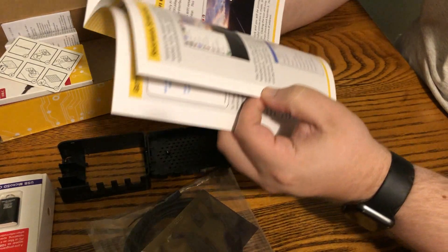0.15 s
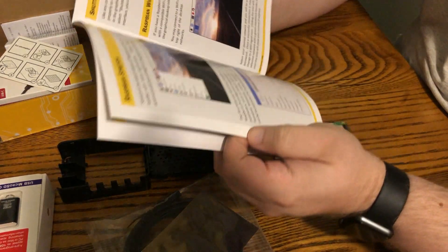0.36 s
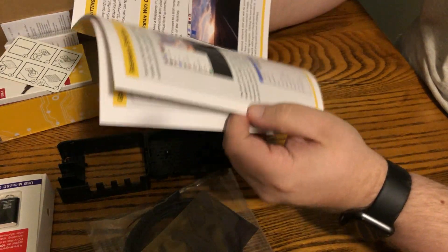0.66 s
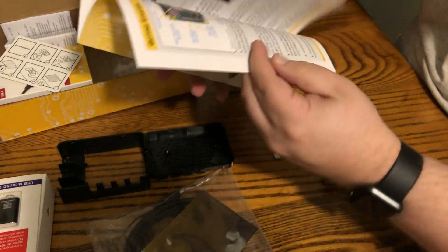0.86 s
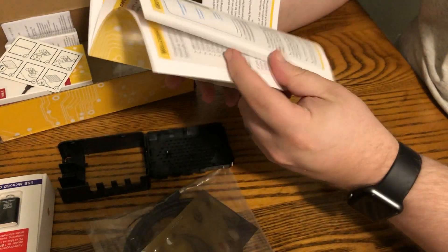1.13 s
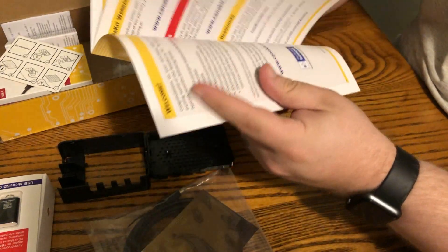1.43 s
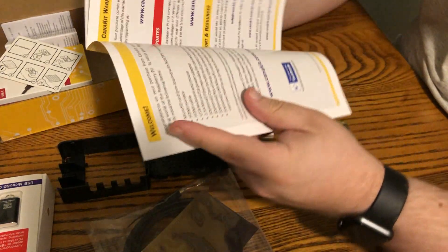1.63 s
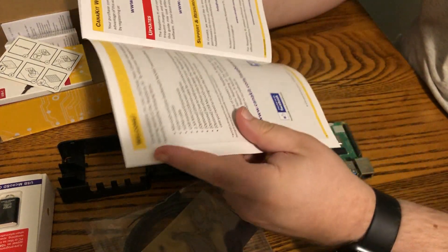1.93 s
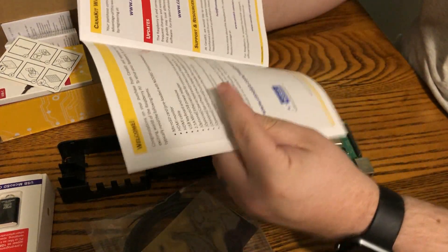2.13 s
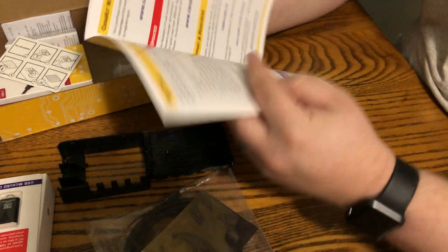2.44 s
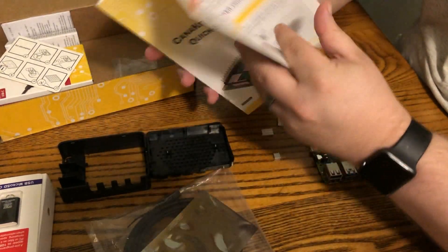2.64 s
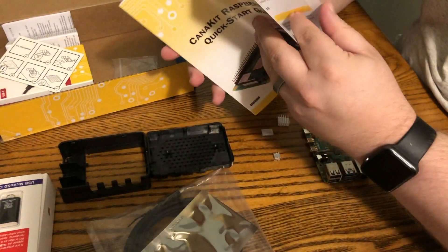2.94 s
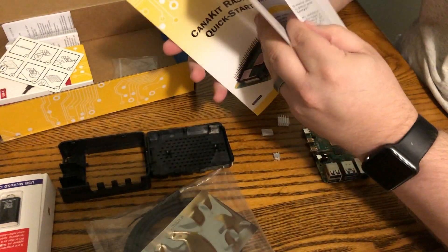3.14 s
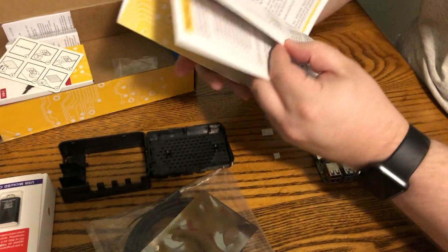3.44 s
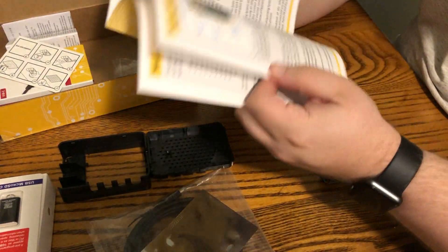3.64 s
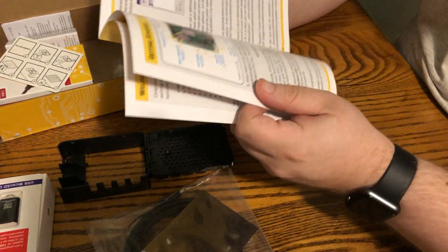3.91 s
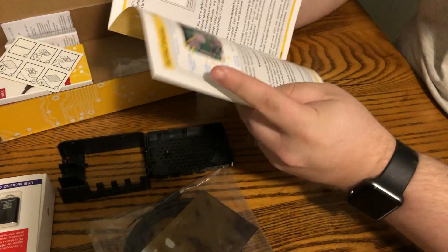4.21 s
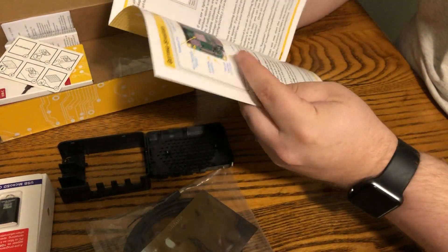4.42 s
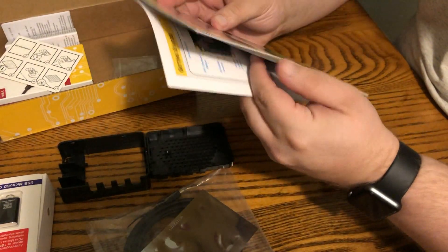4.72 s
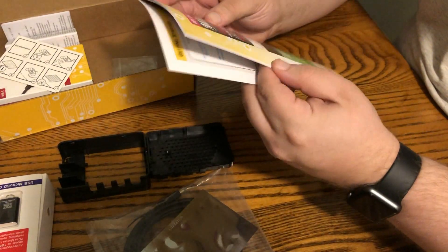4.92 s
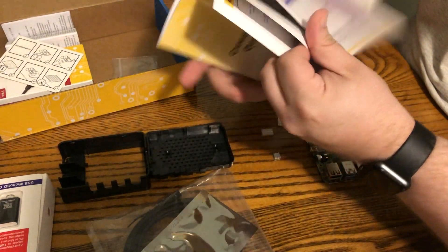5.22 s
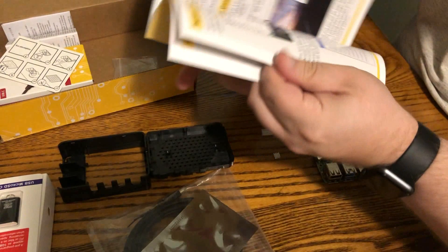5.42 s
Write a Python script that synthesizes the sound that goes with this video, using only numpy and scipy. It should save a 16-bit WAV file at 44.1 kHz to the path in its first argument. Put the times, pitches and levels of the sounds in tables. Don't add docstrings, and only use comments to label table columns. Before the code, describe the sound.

Paper pages brush, snap off a thumb and slap shut in irregular bursts, busiest at the end, above low indoor ventilation hum.

```python
import sys
import numpy as np
from scipy import signal
from scipy.fft import rfft, irfft, next_fast_len
from scipy.io import wavfile
from scipy.ndimage import uniform_filter1d, map_coordinates

SR = 44100
rng = np.random.default_rng(int(sys.argv[2]) if len(sys.argv) > 2 else 0)


def materialize(psi):
    bounded = np.clip(np.atleast_2d(psi).T, -1, 1)
    quanta = np.round(bounded * 32767).astype(np.int16)
    wavfile.write(sys.argv[1], SR, quanta)


def boost_factor(decibels):
    exponent = np.asarray(decibels, float) / 20
    return 10 ** exponent


N = 245498

# (frequency [Hz], density [dB per Hz])
AIR_SPECTRUM = [(15, -67), (25, 0.5), (39, -4), (65, -4), (149, -7), (213, -12), (306, -15), (386, -21.5),
                (756, -23.5), (861, -28), (1140, -33.5), (1600, -41), (11100, -57), (12000, -57),
                (15600, -100), (22000, -120)]
# (frequency [Hz], width [Hz], level [dB])
ROOM_MODES = [(47, 5.2, 7), (103, 17, 1), (120, 18.5, 7), (131.4, 6.3, 7.5), (177.6, 5.6, 7),
              (209.6, 7.5, 10), (254.2, 9.5, 10.5), (300.6, 10.4, 7), (413, 8.4, 5.5), (438.8, 4.8, 11)]
# (time [s], level [dB])
DUCT_SWELLS = [(.22, -32.5), (.42, -29), (.65, -30), (.92, -26.5), (1.35, -33.5), (1.52, -32.5),
               (1.81, -28.5), (2.031, -26), (2.21, -23.5), (2.43, -29), (2.56, -33), (2.78, -30.5),
               (3.16, -28), (3.33, -34), (3.61, -29.5), (3.81, -24.5), (4.0, -26), (4.2, -30), (4.46, -25),
               (4.62, -31.5), (5.0, -31.5), (5.2, -32.5), (5.41, -29.5), (5.55, -28)]
# (strongest at [s], rise time and equal fall time [s], level [dB])
WAVES = [(.1, 0.4, -18), (.46, 0.27, -21), (.8, 0.23, -26), (1.2, 0.95, -23), (1.63, 0.58, -22.5),
         (2.16, 0.15, -18.5), (2.55, 0.59, -21.5), (3.06, 0.63, -31), (3.95, 0.34, -29), (4.31, 0.21, -23),
         (4.68, 0.24, -25), (5.35, 0.52, -24)]
# (frequency [Hz], t60 [s])
ROOM_DECAY = [(300, 0.21), (2000, 0.39), (10000, 0.096)]
# (time [s], peak level [dB], swing [Hz], length [s])
FLAPS = [
    (3.685, -26.5, 260, .008),
    (4.3, -31, 250, 0.028),
    (4.679, -22, 130, 0.015),
    (4.688, -23.5, 188, .016),
    (4.721, -22, 200, 0.0083),
    (5.372, -30, 268, 0.034),
    (5.416, -27.5, 330, .015),
]
# (time [s], level [dB], from [Hz], to [Hz], length [s])
GLIDES = [
    (1.21, -48, 1150, 1550, .045),
    (1.285, -57, 1100, 1450, .03),
    (1.1, -51, 4000, 3300, .03),
    (1.15, -48, 3500, 3600, .05),
    (5.122, -45, 4200, 3700, .03),
    (5.21, -46, 3000, 3600, .025),
    (5.2, -45, 1500, 1050, 0.051),
    (5.253, -44, 2050, 1900, .02),
]
# (time [s], peak level [dB], pitch [Hz], t60 [ms])
POPS = [(1.2645, -29, 1200, 25), (1.268, -46, 7600, 50), (1.362, -38, 2700, 25), (1.362, -46, 7800, 15),
        (3.664, -49, 6200, 8), (3.673, -48, 6500, 9), (3.6815, -30, 2050, 18), (3.683, -33, 1200, 42),
        (3.6815, -35, 6200, 25), (3.729, -46, 3300, 25), (3.753, -46, 3300, 25), (4.054, -34, 1800, 18),
        (4.077, -31, 2000, 20), (4.086, -36, 2200, 15), (4.191, -23, 5200, 11), (4.2, -36, 3500, 15),
        (4.219, -38, 1900, 20), (4.272, -42, 3300, 22), (4.312, -42, 7800, 14), (4.312, -41, 2570, 15),
        (4.507, -45, 2300, 15), (4.518, -47, 2300, 15), (4.678, -34, 6000, 12), (4.683, -36, 7300, 15),
        (4.682, -20, 1250, 24), (4.693, -31, 1900, 15), (4.712, -43, 7600, 14), (4.712, -45, 6100, 12),
        (4.847, -47, 5800, 10.5), (4.953, -44, 8000, 15), (4.953, -46, 6200, 12), (4.973, -46, 7900, 14),
        (5.188, -36, 6800, 20), (5.2, -36, 8200, 15), (5.216, -34, 3700, 15), (5.275, -24, 3400, 18),
        (5.275, -32, 8000, 15), (5.277, -32, 1170, 35), (5.279, -33, 1680, 30), (5.374, -31, 3200, 18),
        (5.372, -37, 7300, 18), (5.469, -25, 2600, 15), (5.468, -33, 7000, 10), (5.469, -33, 1450, 35),
        (5.509, -36, 5800, 12), (5.509, -38, 10500, 12), (5.541, -35, 1400, 25), (5.061, -40, 1760, 15),
        (4.64, -41, 1900, 15), (4.822, -48, 3700, 14)]
# (time [s], level [dB], pitch [Hz], length [s], width [Hz])
SQUEAKS = [(0.46, -46, 3230, 0.016, 430), (0.59, -49, 1960, 0.055, 700), (1.15, -56, 2300, 0.08, 1200),
           (1.14, -52, 1220, 0.059, 450), (5.201, -38.5, 1200, 0.091, 900), (5.314, -47, 5800, .05, 2200),
           (5.399, -45, 5870, 0.028, 2000), (5.128, -43, 2650, .035, 300), (1.366, -46, 2700, 0.022, 500),
           (5.218, -42.5, 3750, .06, 900), (1.198, -50, 7200, .035, 5000), (1.2, -45, 3600, 0.035, 1100),
           (1.605, -63, 4700, .1, 500), (2.918, -53, 5500, .03, 600), (2.998, -51, 6500, 0.037, 1200),
           (3.302, -47.5, 6600, 0.05, 1500), (3.685, -40, 6800, 0.0082, 1600),
           (5.096, -38.5, 1500, 0.011, 100), (2.765, -52, 5800, 0.025, 900), (2.875, -54, 7000, .04, 1500),
           (5.131, -41, 1750, 0.016, 150), (5.13, -42, 6200, 0.022, 1800), (5.159, -34.5, 2680, 0.01, 140),
           (5.244, -33, 1960, 0.0074, 149), (5.296, -36, 3170, 0.0062, 300)]
# (time [s], peak level [dB], air pocket [Hz], push share [0-1], thump [dB])
SLAPS = [(1.2646, -22, 1130, 0.8, -10), (2.268, -31, 1440, 0.3, 3), (2.787, -25, 743, 0.54, 15),
         (3.683, -25.5, 1150, 0.4, 2), (4.0453, -13.5, 696, 0.9, 0), (4.6829, -11, 1230, 0.74, 6),
         (4.689, -20, 900, 0.3, 8), (4.72, -25, 700, 0.7, 17), (5.4035, -13, 714, 0.7, -10),
         (5.406, -14, 1060, 0.75, -3), (5.45, -24, 802, 0.6, 16), (5.469, -20, 690, 0.5, 14),
         (5.477, -26.5, 1300, 0.6, 3), (5.383, -30, 600, 0.7, 14), (5.416, -29, 1200, .5, 12),
         (2.54, -33, 900, .4, -4), (2.667, -34, 900, .4, -1), (4.081, -30, 1300, 0.35, -8),
         (5.126, -28, 1200, .3, -8), (5.232, -25.5, 900, .3, 10), (5.51, -31, 900, 0.7, 2)]
# (time [s], peak level [dB], sheet ring [Hz], brightness [dB], tearing [ms])
SNAPS = [(0.0135, -30, 1200, -12, 1.5), (0.4535, -39, 3310, -17, 2), (0.855, -33, 1500, -13, 1.8),
         (1.2655, -24.5, 3300, -5.5, .9), (1.362, -32, 2650, -24, 2.7), (1.6077, -36.5, 2690, -19, 2.6),
         (2.5336, -33, 1300, -13, 3), (2.7202, -35.5, 2300, -8, 2.5), (2.7685, -30.5, 1950, -13, 2.6),
         (2.8034, -29, 1900, -18, 2), (2.9238, -30.5, 1700, -18, 3.1), (2.9687, -35, 2260, -20, 1.2),
         (2.9826, -31.5, 2900, -4, 1.33), (3.268, -37, 2320, -13, 1.2), (3.2839, -35, 2300, -1, 1.2),
         (3.839, -34, 2510, -22, 1.3), (4.0465, -24, 2400, -15, 0.92), (4.078, -29, 2300, -20, 1.5),
         (4.086, -37, 2780, -23, 1.2), (4.1925, -18.5, 3530, -10, 1.4), (4.313, -37, 2180, -6, 1.3),
         (4.679, -28, 2900, -0.5, 1.1), (5.2420, -28, 1990, -14, 1.2), (5.2755, -20.5, 3400, -5, 3),
         (5.3736, -24.5, 3200, -7, 2.2), (5.3982, -28, 3000, -10, 1.5), (5.4695, -20.5, 2620, -7, 1),
         (5.5102, -25, 2570, 0.5, 0.63), (5.5417, -31, 1400, -15, 2.2), (5.186, -31, 2700, -3, 2.5),
         (5.206, -32, 3200, -6, 1.5), (5.2945, -28, 3170, -16, 1.2), (5.383, -30, 2500, -15, 1.6),
         (5.486, -35, 2800, -9, 1.5), (5.521, -37, 2700, -5, 2), (5.564, -35, 3000, -15, 1.5),
         (5.168, -30, 1200, -15, 2.5), (1.107, -35, 1200, -12, 1.5), (1.2745, -32, 3300, -12, 1.5),
         (1.408, -40, 2400, -12, 1.5)]
# (time [s], peak level [dB], brightness
# [dB])
TICKS = [(0.117, -46, -4), (0.197, -41, -21), (0.8886, -37, -16), (1.837, -46, -18), (2.2666, -35, -16),
         (2.344, -38.5, -5), (2.4676, -41, -18), (2.6444, -35, -1), (2.6638, -34, -22),
         (2.7915, -29.5, -11), (2.8915, -32, -6), (2.953, -43, -16), (3.467, -44, -14), (3.547, -48, 4),
         (4.6844, -26.5, -8), (3.69, -32, -12), (3.927, -37, -18), (3.9816, -40, -23), (4.188, -22.5, -16),
         (4.2, -30, -24), (4.7144, -49, -4), (4.8493, -44, -5), (4.9544, -37, -10), (4.9736, -40, -15),
         (2.491, -40, -9), (3.682, -28, -2.5), (5.0763, -34, -14), (5.125, -33, -6), (2.4758, -41, -18),
         (2.553, -43, -3), (2.70, -44, -6), (2.78, -40, -8), (2.8574, -42, -2), (3.025, -46, -4),
         (.064, -45, -5), (5.005, -37, -12), (5.012, -31.5, -20)]
# (fastest at [s],
# speeding up [s], slowing down [s], rub level [dB], brightness [dB])
SWEEPS = [(0.073, .03, 0.085, -64, 5), (0.59, 0.065, 0.024, -50, -0.5), (.814, 0.039, 0.21, -59.5, 1),
          (.888, 0.033, 0.03, -55, -4), (1.1, 0.056, 0.12, -48.5, 4.5), (1.21, 0.15, 0.1, -47, -2.5),
          (1.36, .08, 0.19, -57, -3), (1.6, 0.1, .08, -58, 5), (2.545, .06, 0.081, -51.5, -0.5),
          (2.76, 0.12, 0.12, -53, -3), (2.865, 0.033, 0.096, -55.5, 6), (3.0, .05, 0.16, -59.5, 2),
          (3.301, 0.046, 0.07, -46, 2.5), (3.38, 0.16, 0.46, -65, -2.5), (3.7, 0.04, 0.14, -49, -2),
          (3.844, 0.094, 0.16, -50, -3), (4.185, 0.12, 0.093, -49, 0.5), (4.288, 0.08, 0.073, -51, 0),
          (4.655, 0.14, 0.062, -51.5, 2.5), (4.78, 0.053, 0.11, -57.5, -2),
          (5.125, 0.086, 0.064, -43, -3.5), (5.2, 0.027, 0.1, -38.5, 2), (5.372, 0.048, 0.051, -43, -1),
          (5.506, 0.094, 0.13, -44, -1), (4.191, 0.013, 0.025, -42, -5), (4.943, .003, .006, -58, 3),
          (4.768, .003, .012, -60, -2), (4.4, .005, .012, -59, 0), (5.02, .006, .015, -52, -10),
          (4.087, .004, .012, -49, -7), (4.6, 0.065, .05, -61, 5), (2.277, .006, .02, -55, -14),
          (2.69, .004, .012, -58, 0), (2.354, .004, .012, -59, 0), (5.407, .012, 0.016, -48, 4),
          (3.691, .006, .012, -44, 2), (1.15, .06, .06, -55, -1), (5.478, .008, .02, -46, -9)]
# (time [s], rub level [dB], brightness [dB])
FLICKS = [(.001, -50.5, -2), (.194, -58, -8), (.25, -58, -15), (0.457, -48.5, -4), (.56, -59, -1),
          (.725, -61, 0), (.965, -59, 0), (1.285, -45, -4), (1.364, -48, -7.5), (1.75, -61, 0),
          (2.274, -58, -19), (2.342, -67, -2), (2.47, -57, 0), (2.63, -52, 2), (2.8, -53, -5),
          (2.92, -54, -11), (3.23, -54.5, -1), (3.984, -50, -7), (4.036, -53.5, 0), (4.095, -49.5, -10),
          (4.2, -53, -5), (5.165, -44.5, -3), (4.52, -64, -14), (4.7, -46, -14), (4.725, -53, -14),
          (4.797, -58, -8), (4.825, -61, -8), (4.38, -61, -16), (.52, -58, -6), (.37, -63, -8),
          (3.57, -66, 4), (4.958, -65, 6), (5.01, -56, -5), (5.075, -48.5, -9), (5.268, -42, -6),
          (5.315, -47.5, 4), (5.445, -50, 0)]
# (frequency [Hz], density [dB per Hz])
FLEX_SPECTRUM = [(500, 3), (900, -3.5), (1300, 1), (1900, -5.5), (2600, -8), (4500, -44)]
RUB_SPECTRUM = [(1200, -2), (2300, 0.5), (2900, 0), (3300, 2.5), (3650, -2.5), (4100, -5.5), (5500, -17),
                (9000, -55)]
SHEEN_SPECTRUM = [(2000, -55), (4000, -1), (6500, 3.5), (8500, -1), (11500, -0.5), (13000, -31)]

FLICK_RISE_S, FLICK_FALL_S = 0.025, 0.063
FLEX_DB, SHEEN_DB = 6.5, -1
FLEX_LEANS, SHEEN_LEANS = -0.38, 0.93
HELD_DB, HELD_BRIGHT_DB = -74, -4.5
SWEEP_SHAPE, FLICK_SHAPE, AIR_SHAPE = 1.6, 1.04, 1.23
FADE_DB = 21
SWELL_S = 0.14
STACK_HZ, TICK_MS, FLUTTER_T60_S = 1800, 1.06, 0.039
THUD_T60_S, PUFF_DB = 0.033, -1.5
GLIDE_WIDTH_HZ = 480
POP_ATTACK_S, POP_SAG = 0.001, 0.03


def unit(x):
    return x / np.sqrt(np.mean(x ** 2) + 1e-20)


def along(points, hz):
    f, value = np.transpose(points)
    return np.interp(np.log(hz + 1), np.log(f + 1), value)


def wobble(rate):
    knots = rng.standard_normal(int(N * rate / SR) + 4)
    return map_coordinates(knots, [np.arange(N) * rate / SR])


def filtered(x, response):
    m = next_fast_len(len(x) + 8192)
    return irfft(rfft(x, m) * response(np.fft.rfftfreq(m, 1 / SR)), m)[:len(x)]


def peak(f, hz, width_hz):
    return 1j * f * width_hz / (hz * hz - f * f + 1j * f * width_hz)


def add(track, s, sound):
    part = track[max(round(s * SR), 0):][:len(sound)]
    part += sound[:len(part)]


def swells(s, rise_s, fall_s, db, shape):
    s, rise_s, fall_s, db = [np.reshape(v, (-1, 1)) for v in (s, rise_s, fall_s, db)]
    late = np.arange(0, N + 64, 32) / SR - s
    far = np.maximum(-late / (np.abs(rise_s) + 0.0013), late / (np.abs(fall_s) + 0.0014))
    power = boost_factor(2 * (db - FADE_DB * far ** shape)).sum(axis=0)
    return np.interp(np.arange(N) / 32, np.arange(len(power)), np.sqrt(power))


def ventilation():
    def response(f):
        modes = sum(boost_factor(2 * db) * np.abs(peak(f, hz, w)) ** 2 for hz, w, db in ROOM_MODES)
        gap = 1 - 0.5 * np.abs(peak(f, 92.3, 7.7))
        return boost_factor(along(AIR_SPECTRUM, f)) * np.sqrt(1 + modes) * gap

    noise = filtered(rng.standard_normal(N), response)
    return boost_factor(-30 + 0.29 * wobble(5.15)) * unit(noise)


def hum():
    s, db = np.transpose(DUCT_SWELLS)
    hz = 139.5 + 2.47 * wobble(9)
    tone = np.sin(2 * np.pi * np.cumsum(hz) / SR)
    return boost_factor(2) * swells(s, SWELL_S, SWELL_S, db, AIR_SHAPE) * tone


def draught():
    s, length, db = np.transpose(WAVES)
    slow = filtered(rng.standard_normal(N), lambda f: peak(f, 12.2, 39) / (1 + (f / 20) ** 14))
    return swells(s, length, length, db, AIR_SHAPE) * unit(slow)


def room(x):
    hz, t, z = signal.stft(rng.standard_normal(SR // 2), SR, nperseg=256)
    decay = boost_factor(-60 * t / along(ROOM_DECAY, hz)[:, None])
    tail = signal.istft(z * decay, SR, nperseg=256)[1]
    late = np.pad(x, (260, 0))
    return signal.fftconvolve(late, tail / np.linalg.norm(tail))[:N]


def flaps():
    s, db, hz, length = np.transpose(FLAPS)[:, :, None]
    t = np.arange(N) / SR - s
    swing = np.exp(-(2 * t / length) ** 2) * np.sin(2 * np.pi * hz * t)
    return (boost_factor(db) * swing).sum(axis=0)


def glides():
    out, t = np.zeros(N), np.arange(-SR // 8, SR // 8) / SR
    noises = rng.standard_normal((len(GLIDES), 2, len(t)))
    for (s, db, from_hz, to_hz, length), noise in zip(GLIDES, noises):
        a, b = [unit(filtered(v, lambda f: 1 / (1 + (2 * f / GLIDE_WIDTH_HZ) ** 2))) for v in noise]
        hz = np.interp(t / length, [-0.5, 0.5], [from_hz, to_hz])
        turn = 2 * np.pi * np.cumsum(hz) / SR
        swell = np.exp(-(1.6 * t / length) ** 4)
        add(out, s + t[0], boost_factor(db) * swell * (a * np.cos(turn) + b * np.sin(turn)))
    return out


def pops():
    out, t = np.zeros(N), np.arange(SR // 16) / SR
    for s, db, hz, t60_ms in POPS:
        life = t / (t60_ms / 1300 + 1e-3)
        turn = 2 * np.pi * hz * t * (1 - POP_SAG * np.minimum(life, 1))
        attack = 1 - np.exp(-t / POP_ATTACK_S)
        add(out, s, boost_factor(db + 4.5 - 60 * life) * attack * np.sin(turn))
    return out


def squeaks():
    out, t = np.zeros(N), np.arange(SR // 3) / SR
    noises = rng.standard_normal((len(SQUEAKS), len(t)))
    for (s, db, hz, length, width_hz), noise in zip(SQUEAKS, noises):
        swell = np.exp(-((t - t.mean()) / (length / 2)) ** 2)
        tone = filtered(noise, lambda f: peak(f, hz, width_hz) ** 2)
        loudness = np.sqrt(np.average(tone ** 2, weights=swell ** 2))
        add(out, s - t.mean(), boost_factor(db) * swell * tone / loudness)
    return out


def slaps():
    out, t = np.zeros(N), np.arange(SR // 8) / SR
    noises = rng.standard_normal((len(SLAPS), len(t)))
    for (s, db, hz, share, thump_db), noise in zip(SLAPS, noises):
        def pocket(f):
            return (peak(f, hz, 0.21 * hz) + boost_factor(thump_db) * peak(f, 382, 160)) * peak(f, 370, 2000)

        pulse = -np.exp(-((t - 0.001) / 0.00032) ** 2)
        push = filtered(pulse, lambda f: pocket(f) + boost_factor(PUFF_DB) * peak(f, 290, 2800))
        thud = filtered(noise * boost_factor(-60 * t / THUD_T60_S) * (1 - np.exp(-t / 0.0014)), pocket)
        sound = share * push / np.abs(push).max() + (1 - share) * thud / np.abs(thud).max()
        add(out, s - 0.001, boost_factor(db + 3) * sound)
    return out


def snaps():
    def sheet(f, hz):
        return (peak(f, hz, 0.2 * hz) + 0.19 * peak(f, 2000, 4500)) * peak(f, 1200, 6600)

    out, t = np.zeros(N), np.arange(SR // 8) / SR
    edges = SNAPS + [(s, db, STACK_HZ, bright_db, TICK_MS) for s, db, bright_db in TICKS]
    noises = rng.standard_normal((len(edges), 2, len(t)))
    for (s, db, hz, bright_db, ms), noise in zip(edges, noises):
        u = t / (ms / 1000 + 1e-4)
        flutter = boost_factor(-60 * t / FLUTTER_T60_S) * (1 - np.exp(-u * u))
        crack = 1.4 * np.exp(-(1.34 * (u - 1.2)) ** 2)
        burst = noise * (flutter + crack)
        body = filtered(burst[0], lambda f: sheet(f, hz))
        edge = filtered(burst[1], lambda f: peak(f, 5800, 5100) ** 2 * (0.35 + peak(f, 5700, 6000)))
        add(out, s - 0.0015, boost_factor(db - 0.5) * body / np.abs(body).max())
        add(out, s - 0.0015, boost_factor(db + bright_db) * edge / np.abs(edge).max())
    return out


def strokes(over_db, leans):
    s, rise_s, fall_s, db, bright_db = np.transpose(SWEEPS)
    sweeps = swells(s, rise_s, fall_s, db + over_db + leans * bright_db, SWEEP_SHAPE)
    s, db, bright_db = np.transpose(FLICKS)
    flicks = swells(s, FLICK_RISE_S, FLICK_FALL_S, db + over_db + leans * bright_db, FLICK_SHAPE)
    held = boost_factor(HELD_DB + over_db + leans * HELD_BRIGHT_DB)
    return held + np.hypot(sweeps, flicks)


def crackle():
    rub = strokes(0, 0)
    when, pitch, size, life = rng.random((4, 5000))
    t = np.arange(600) / SR
    hz = 1000 * 6.5 ** pitch[:, None]
    cycles = 2.5 * 7 ** (life[:, None] ** 2)
    at = (when * (N - len(t))).astype(int)
    strength = rub[at] * boost_factor(-9 - 3.5 * np.log(size + 0.011))
    gain = strength[:, None] / np.sqrt(cycles / 4)
    envelope = np.exp(-t * hz / cycles) * (1 - np.exp(-t / 0.00023)) * (1 - t / t[-1])
    rings = gain * np.sin(2 * np.pi * hz * t) * envelope
    return np.bincount((at[:, None] + np.arange(len(t))).ravel(), rings.ravel(), N)


def patchy(depth_db):
    z = signal.stft(rng.standard_normal(N + 512), nperseg=256)[2]
    field = uniform_filter1d(rng.standard_normal(z.shape), size=2, axis=0)
    field = uniform_filter1d(field, size=6, axis=1)
    return signal.istft(z * boost_factor(depth_db * unit(field)), nperseg=256)[1][:N]


def slide():
    grip = boost_factor(0.86 * wobble(35) + 1.95 * wobble(90) + 1.8 * wobble(400))

    def voice(spectrum):
        return unit(filtered(grip * patchy(depth_db=2), lambda f: boost_factor(along(spectrum, f))))

    flex = strokes(FLEX_DB, FLEX_LEANS) * voice(FLEX_SPECTRUM)
    rub = strokes(0, 0) * voice(RUB_SPECTRUM)
    sheen = strokes(SHEEN_DB, SHEEN_LEANS) * voice(SHEEN_SPECTRUM)
    return boost_factor(-2) * (flex + rub + sheen)


def scene():
    paper = slide() + crackle() + snaps() + slaps() + squeaks() + glides() + flaps()
    air = ventilation() + hum() + draught()
    return (paper + pops() + boost_factor(-14) * room(paper) + air)[None]


def band_limit(x):
    return signal.sosfilt(signal.butter(12, 12490, fs=SR, output="sos"), x)


def record(dry):
    top_hz = 11730
    kept = filtered(dry[0], lambda f: 1 / (1 + (f / top_hz) ** 90))
    return band_limit(kept[None])


dry = scene()
out = record(dry)
materialize(out)
```